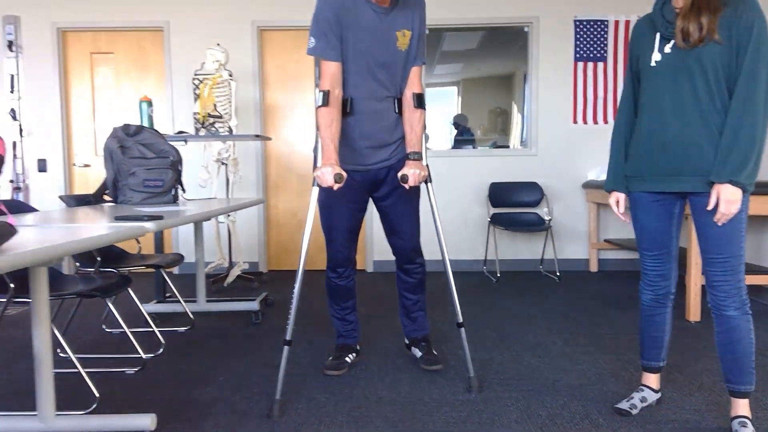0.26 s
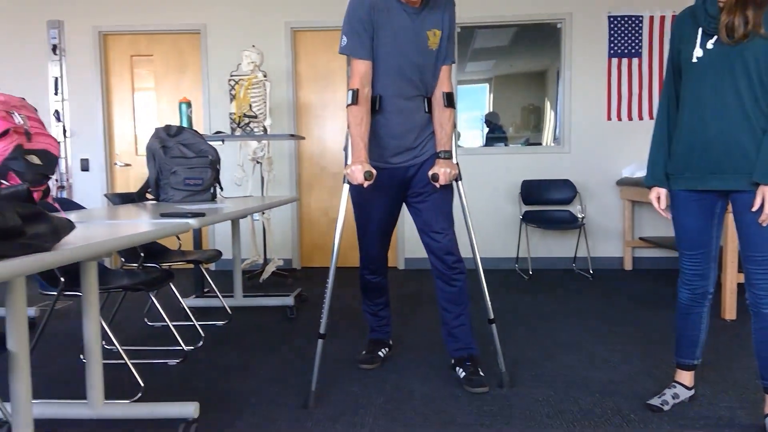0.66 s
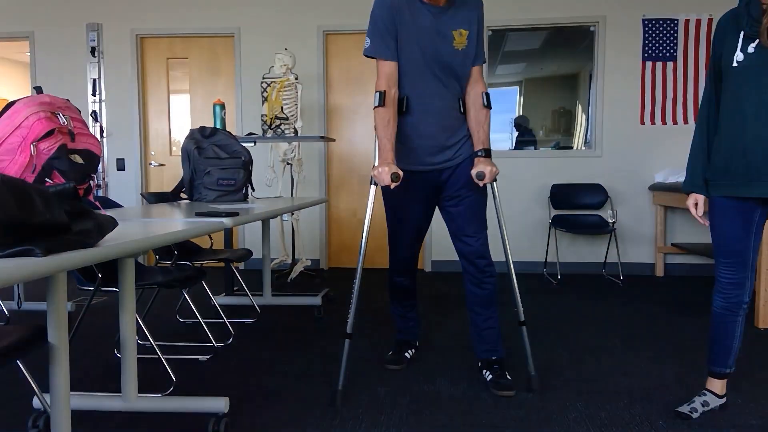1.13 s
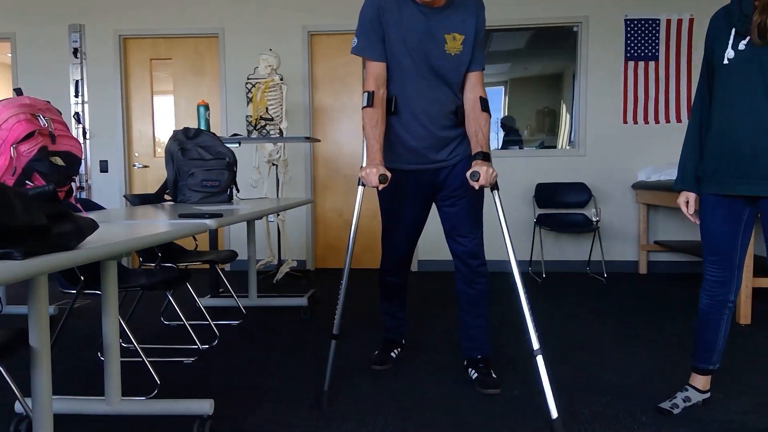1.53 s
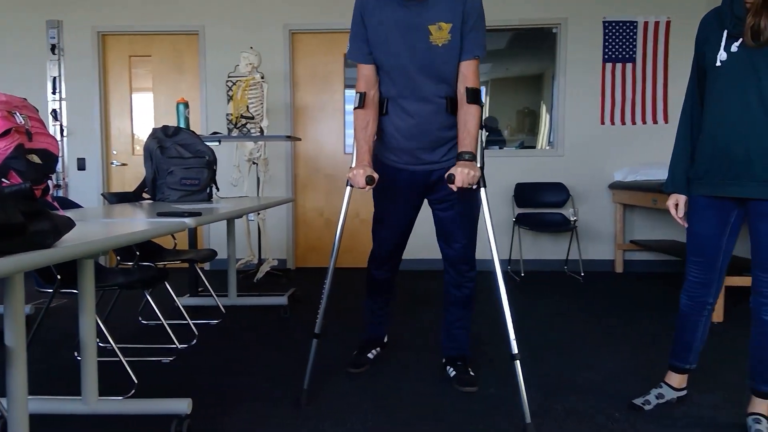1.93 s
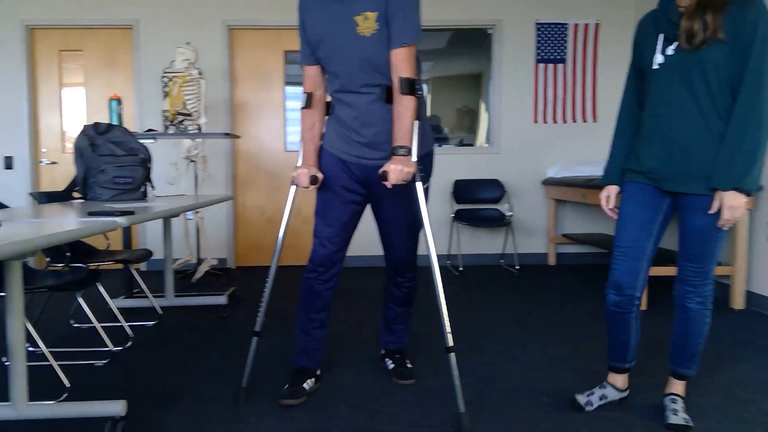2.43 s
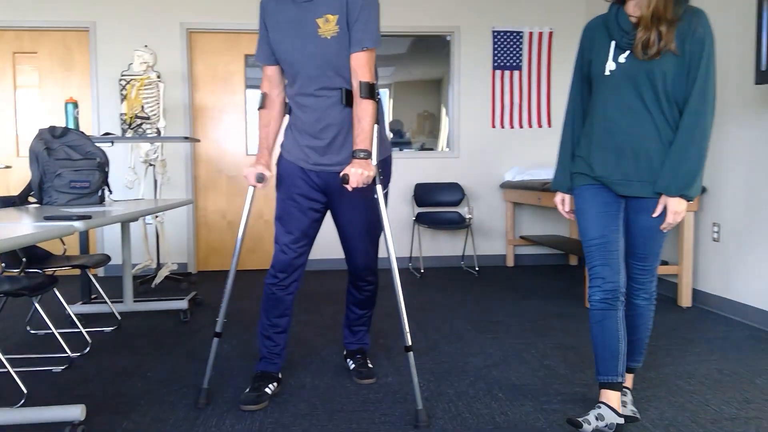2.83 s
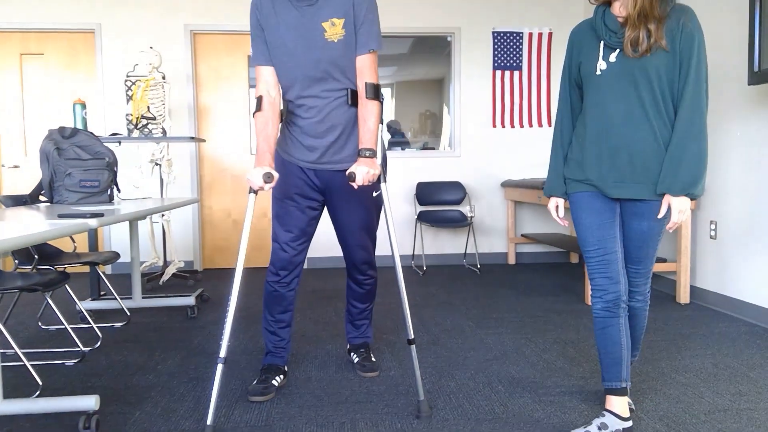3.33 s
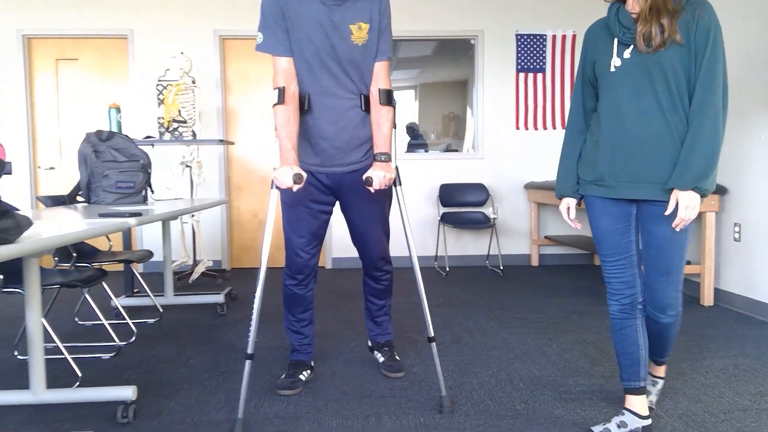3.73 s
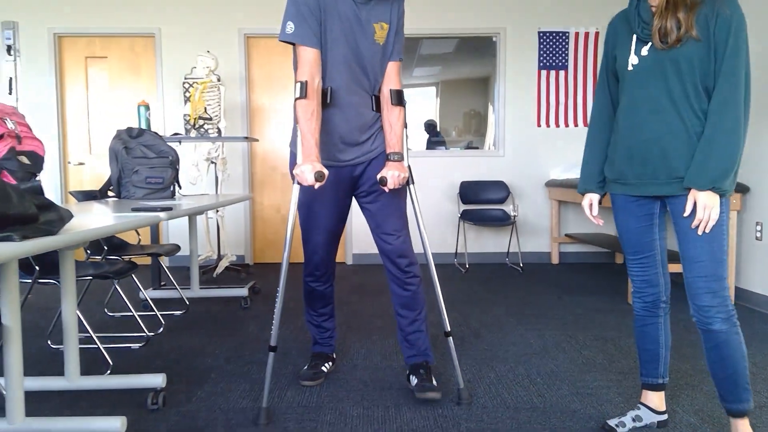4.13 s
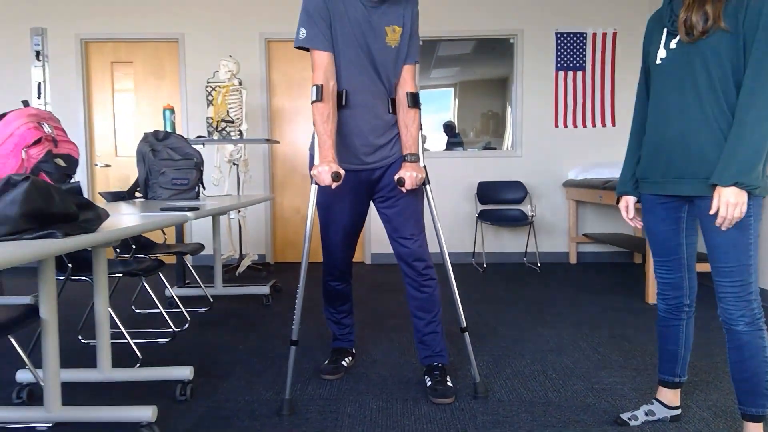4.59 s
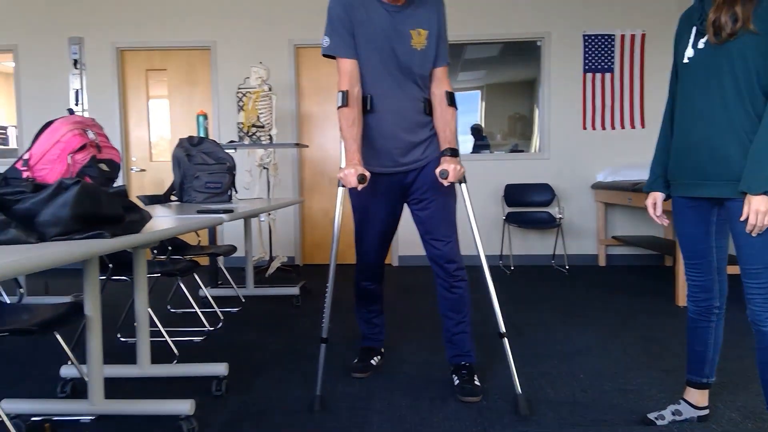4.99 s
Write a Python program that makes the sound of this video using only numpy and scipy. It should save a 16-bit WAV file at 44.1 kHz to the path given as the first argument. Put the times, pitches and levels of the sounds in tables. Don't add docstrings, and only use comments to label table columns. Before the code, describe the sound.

Low ventilation rumble and thin hiss fill a hard-walled, carpeted room. Crutch pins and cuffs tick faintly, a shoe steps softly, and a tip lands with a dull boom. After a rough sole drag come three increasingly strong metallic knocks, the last by far the loudest. Rubber chirps briefly, then brushes and tiny ticks fade into the room tone. Heard from a few metres by a small stereo microphone, the crutch sounds sit right of centre.

```python
import sys
import numpy as np
from scipy import signal
from scipy.fft import rfft, irfft, next_fast_len
from scipy.io import wavfile
from scipy.ndimage import uniform_filter1d

SR = 44100
rng = np.random.default_rng(int(sys.argv[2]) if len(sys.argv) > 2 else 0)


def file_out(sig):
    cols = np.atleast_2d(sig).T
    lim = np.clip(cols, -1, 1)
    pcm = np.round(lim * 32767).astype(np.int16)
    wavfile.write(sys.argv[1], SR, pcm)


def elevation(decibels):
    levels = np.asarray(decibels, float)
    return 10 ** (levels / 20)


N = 231611
TIME = np.arange(N) / SR

# (freq_hz, level_db, t60_s)
PIN = (0.36, [(590, -57.5), (1000, -33), (1550, -16), (2870, -10), (3500, 2), (4100, -17.5), (8000, -29),
       (11000, -81)], [(3500, -3, 0.067), (2950, -17, 0.012)])
CLIP = (1.26, [(300, -36), (500, -15.5), (1600, -14), (1890, 1.5), (3000, -27), (3620, 10.5), (4400, -12),
        (10000, -39)], [(3650, -13, .015), (3860, -3, 0.008), (2080, -21, 0.0089)])
CUFF = (0.59, [(880, -69), (1500, -36), (2620, -29), (3280, -9.5), (4400, -4.5), (5900, -1), (7100, -4.5),
        (15500, -26.5)], [(6910, -6, .025), (5960, -7, 0.033), (4460, -5, 0.011), (3400, -6, 0.022)])
JOINT = (.3, [(1500, -61.5), (2160, -22), (3000, -29), (3600, -5), (5800, -12.5), (6680, 4.5), (7400, -8),
         (16000, -23)], [(3740, -18.5, .25), (3628, -18, 0.24), (4082, -14.5, 0.064), (4032, 2.5, .016),
         (3480, -4.5, 0.0091), (6780, -12, .24), (6842, -12.5, .18), (6300, -6, 0.013), (2844, -22.5, 0.11),
         (2350, -22, 0.088)])
HEEL = (2.5, [(120, -39), (200, -9.5), (397, -5.5), (700, -17), (1230, -22), (1680, -12.5), (5000, -58),
        (11000, -120)], [(390, 0, .05), (753, 1.5, 0.2)])
TOE = (0.58, [(350, -44), (738, -1), (1090, -20), (1380, 4), (2100, -13), (4000, -40), (8800, -110)],
       [(1450, -6, .027)])
TIP = (9, [(240, -38), (450, 5.5), (1590, 5.5), (2300, -6.5), (2790, 3.5), (5310, -10), (7670, 0),
       (15500, -42)], [(2710, -8, .02), (3110, 8, 0.024), (4200, -11, .03), (530, -3, 0.019),
       (890, -8, 0.018), (1450, -3, 0.022)])
SHAFT = (0.68, [(150, -32), (420, -12), (830, -3.5), (1600, -10.5), (2050, -1), (4600, -11), (6500, -10),
         (16000, -24)], [(844.4, -2, 0.068), (1274.6, 10.5, 0.017), (1914, -14, 0.45), (2070, -12.5, 0.14),
         (2656, 2, 0.0094), (3726, -22, .18), (6413, -15.5, .1), (6800, -15.5, 0.13), (7300, -3.5, .037)])
CLASP = (.16, [(880, -61), (1500, -30.5), (2600, -31.5), (3220, 4), (4240, -5.5), (7600, -1.5),
         (10000, -10), (16000, -25.5)], [(3215, -0.5, .012), (4332, -4.5, .015), (5240, -6.5, 0.011),
         (6984, -2.5, 0.027), (8300, -10, .02), (14370, -15, 0.071)])
BUTTON = (.81, [(1470, -71), (2500, -42), (3290, -6), (4200, -8), (5790, -8), (6790, -5), (12000, -29),
          (20000, -100)], [(3400, 3.5, 0.018), (3735, -7, 0.13), (6930, -14.5, .08)])


def on_log(table, hz):
    table_hz, value = np.transpose(table)
    return np.interp(np.log(np.maximum(hz, 1)), np.log(table_hz), value)


def unit(x):
    return x / np.sqrt(np.mean(x ** 2))


def colour(x, gain):
    size = next_fast_len(x.shape[-1])
    cepstrum = irfft(np.log(gain(np.fft.rfftfreq(size, 1 / SR)) + 1e-9), size)
    cepstrum[1:size // 2] *= 2
    cepstrum[size // 2 + 1:] = 0
    return irfft(rfft(x, size) * np.exp(rfft(cepstrum)), size)[..., :x.shape[-1]]


def decay(t, t60_s):
    return np.exp(-np.log(1000) * t / t60_s)


def ring(t, hz, t60_s):
    return np.sin(2 * np.pi * hz * t) * decay(t, t60_s)


def sweep(hz):
    return 2 * np.pi * np.cumsum(hz) / SR


def pan(db):
    return elevation(np.array([[db], [-db]]) / 2)


def add(track, at_s, sound, pan_db):
    i = int(at_s * SR)
    part = sound[:N - i]
    track[:, i:i + len(part)] += part * pan(pan_db)


def walk(rate_hz):
    k = int(SR / rate_hz)
    steps = np.repeat(rng.standard_normal(N // k + 1), k)
    return 0.94 * uniform_filter1d(uniform_filter1d(steps, k), k)[:N]


def fade(start_s, end_s, edge_s):
    return np.clip(np.minimum(TIME - start_s, end_s - TIME) / edge_s, 0, 1)


def air():
    # freq_hz, level_db_per_hz
    spectrum = [(9, -26.5), (15, 5.5), (40, -21.5), (65, -16.5), (180, -27.5), (750, -45), (3300, -53),
                (15500, -59.5)]
    # freq_hz, likeness_0_to_1
    likeness = [(30, .92), (80, 0.98), (200, 1), (1000, 0.22), (5000, .05)]
    # time_s, level_db
    rumble = [(0, -0.5), (2.2, -2), (3.7, 0.5), (4.4, -1), (5.25, -3.5)]
    # freq_hz, level_db
    whine_tones = [(11806, -85.5)]
    # multiple_of_100_hz, level_db
    buzz_tones = [(8, -99), (9, -93.5), (10, -95.5), (11, -95)]
    level_db, top_hz, buzz_hz = -56.5, 15800, 100

    size = next_fast_len(N)
    f = np.fft.rfftfreq(size, 1 / SR)
    swell_db = np.interp(TIME, *np.transpose(rumble)) + 2.9 * walk(2.9)
    like = np.clip(on_log(likeness, f), 0, 1)
    tone = elevation(on_log(spectrum, f)) / np.hypot(1, (f / top_hz) ** 150)
    mid, side = rfft(rng.standard_normal((2, size))) * tone * np.sqrt([1 + like, 1 - like])
    place = 2 * np.log2(np.clip(f, 20, 20 * 2 ** 9.5) / 20)
    noise = 0
    for band in range(20):
        share = np.clip(1 - np.abs(place - band), 0, 1)
        depth = np.clip(1.3 - band / 14, .1, 1)
        part = irfft([(mid + side) * share, (mid - side) * share], size)[:, :N]
        noise = noise + elevation(depth * (swell_db + 0.63 * walk(10))) * part
    whine = sum(elevation(db + 3.5) * np.sin(2 * np.pi * hz * TIME) for hz, db in whine_tones)
    buzz = sum(elevation(db + 6.0) * np.sin(2 * np.pi * k * buzz_hz * TIME) for k, db in buzz_tones)
    return elevation(level_db) * unit(noise) + whine + fade(1.36, 2.05, 0.02) * buzz


def whistles():
    # start_s, length_s, first_hz, last_hz, level_db
    glides = [
        (.89, .08, 14800, 14850, -78),
        (.99, .07, 14700, 14800, -87),
        (1.085, .09, 13600, 12700, -85),
        (4.542, 0.068, 13500, 14200, -75.5),
        (4.593, .09, 14590, 16000, -85),
        (4.76, .16, 15300, 15280, -80),
        (4.736, 0.13, 14700, 13600, -89),
    ]
    out = 0
    for start_s, length_s, first_hz, last_hz, db in glides:
        hz = np.interp(TIME, [start_s, start_s + length_s], [first_hz, last_hz]) + 110 * walk(150)
        swell = fade(start_s, start_s + length_s, length_s / 2) ** 2
        out = out + swell * elevation(db + 8 + 4.7 * walk(40)) * np.sin(sweep(hz))
    return out


def thuds():
    # start_s, level_db, freq_hz, t60_s
    knocks = [
        (.22, -70, 519, 1.),
        (.423, -65.5, 393, 0.17),
        (.76, -60, 95, 0.42),
        (1.119, -71.5, 530, .3),
        (2.1, -62, 68.4, 0.59),
        (2.481, -55, 206, 0.19),
        (3.718, -70, 110.2, 0.37),
        (4.55, -81, 548, 0.97),
    ]
    # start_s, level_db, tilt_db_per_octave
    landings = [
        (1.681, -57.5, 0),
        (3.381, -45, -0.5),
    ]
    # freq_hz, level_db, t60_s
    slab = [(30.87, -5, 0.56), (68, 1.5, 0.93), (95, -10, .7), (119.5, -6, 0.44), (187.6, -6, 0.64),
            (240.6, -9, 0.94), (331, -5, 0.33)]
    side_db = -10

    out, t = np.zeros((2, N)), TIME[:SR]
    booms = [(at_s, db + mode_db + tilt_db * np.log2(hz / 100), hz, t60_s)
             for at_s, db, tilt_db in landings for hz, mode_db, t60_s in slab]
    for at_s, db, hz, t60_s in knocks + booms:
        mid, side = (sum(ring(t + lead / hz, hz + 11 * detune, np.inf) for detune, lead in draw)
                     for draw in rng.standard_normal((2, 5, 2)))
        swell = elevation(db - 4.0) * (1 - np.exp(-t * hz / 1.6)) * decay(t, t60_s)
        side_gain = elevation(side_db) * hz / 100 / (1 + hz / 300)
        boom = swell * (mid + side_gain * side * np.array([[1], [-1]]))
        i = int(at_s * SR)
        out[:, i:i + SR] += boom[:, :N - i]
    return out


def scuffs():
    # start_s, length_s, level_db, stiffness_ratio, rumble_share_db
    drags = [
        (1.023, 0.18, -89.5, 0.34, 12.5),
        (1.75, .12, -85, 1.3, 12),
        (1.883, 0.13, -78.5, 1.22, 2),
        (2.212, 0.11, -65.5, 0.93, -3),
        (2.258, 0.13, -67, 1.02, -4),
        (2.373, 0.19, -51, .98, -8.5),
        (3.675, 0.24, -76.5, 1.16, 9.5),
        (4.185, 0.0984, -65, 1.36, -25),
        (4.24, 0.089, -60.5, 1.12, -4),
    ]
    # freq_hz, width_hz, level_db
    sole_modes = [(755.5, 140, -12.5), (1212, 250, -2.5), (1340, 85, -0.5), (1560, 190, 1.5),
                  (1705, 83, -11), (1900, 320, -10.5), (2290, 98, -4)]
    # freq_hz, level_db_per_hz
    pile = [(1470, -59), (2500, -1), (3450, -0.5), (4260, 3), (6980, -10), (9710, -17), (15000, -26.5)]
    attack_s, release_s, sag_db = 0.038, 0.04, -5

    tugs = rng.standard_normal((3, N))
    bursts_db = 1.2 * rng.exponential(size=(3, N // 64 + 1)).clip(0, 2.5)
    tugs = tugs * elevation(bursts_db.repeat(64, axis=1)[:, :N])
    hiss = unit(colour(tugs[1], lambda f: elevation(on_log(pile, f))))
    floor = unit(colour(tugs[2], lambda f: np.sqrt(f / 300) / (1 + (f / 700) ** 3)))
    out, uneven_db = 0, 2.5 * walk(45)
    for start_s, length_s, db, stiffness, rumble_db in drags:
        sole = unit(colour(tugs[0], lambda f: sum(
            elevation(mode_db) / np.hypot(1, 2 * (f / stiffness - hz) / width_hz) ** 2
            for hz, width_hz, mode_db in sole_modes)))
        done = np.clip((TIME - start_s) / length_s, 0, 1)
        edges = np.minimum(done * length_s / attack_s, (1 - done) * length_s / release_s)
        press = np.clip(edges, 0, 1) ** 2 * elevation(db - 4.0 + sag_db * done + uneven_db)
        hiss_db = -9.5 + 3.5 - 0.4551 * (max(db, -70) + 64.5)
        out = out + press * (sole + hiss * elevation(hiss_db) + floor * elevation(rumble_db))
    return out * pan(-10)


def squeak():
    creep_s, grab_s, free_s = 3.68, 3.742, 3.828
    grab_hz, slip_hz_per_s = 1116, 11500
    creep_db, slip_db, chirp_db, chirp_s = -68.5, -60.5, -38.5, 0.0053

    since_s = TIME - grab_s
    rate_hz = grab_hz + slip_hz_per_s * np.clip(since_s, -.1, .1)
    phase = sweep(rate_hz * (1 + 0.043 * walk(260)))
    slip = elevation(slip_db) + elevation(chirp_db) * np.exp(-np.abs(since_s) / chirp_s)
    load = elevation(creep_db) + np.clip(since_s / 0.0032, 0, 1) * slip
    grip = fade(creep_s, free_s, 0.008) * load * elevation(5.1 * walk(200))
    return grip * (np.sin(phase) + elevation(-26.5) * np.sin(3 * phase)) * pan(3)


def ticks():
    # start_s, peak_db, freq_hz, t60_s, partner_mode_ratio
    touches = [
        (1.139, -80, 3500, .032, .96),
        (1.349, -80, 3400, 0.02, 1),
        (1.901, -75, 1340, 0.049, 1.85),
        (2.087, -68.5, 3150, 0.016, 1.18),
        (2.39, -64, 4200, 0.065, 1.07),
        (4.833, -67, 3650, 0.05, 0.91),
        (5.04, -81, 3400, .041, 1.13),
        (.001, -71, 1450, .013, 2.03),
        (2.871, -68.5, 2016, .033, 1.24),
        (3.79, -75.5, 5710, 0.065, 0.65),
    ]
    partner_db, partner_t60_s, grit_db, grit_s = -6, 0.044, -21.5, 0.00033

    out, t = np.zeros((2, N)), TIME[:SR // 2]
    for at_s, db, hz, t60_s, ratio in touches:
        modes = ring(t, hz, t60_s) + elevation(partner_db) * ring(t, hz * ratio, partner_t60_s)
        grit = np.diff(rng.standard_normal(len(t) + 1)) * np.exp(-t / grit_s)
        push = 1 - np.exp(-t * hz / 0.89)
        add(out, at_s, elevation(db) * (push * modes + elevation(grit_db) * grit), pan_db=-22)
    return out


def clacks():
    # start_s, peak_db, left_minus_right_db, ring_db, contact_ms, struck part
    blows = [
        (.189, -57.5, -23.5, 0, 4.5, PIN),
        (.4253, -41.5, -23.5, -8.5, 0.65, CUFF),
        (0.5969, -47.5, -25, -12, 2.3, CLIP),
        (.701, -55, -9, -23, 5.6, HEEL),
        (.815, -62, -11, -14, 1.8, TOE),
        (1.675, -43.5, -18.5, -17, 3.3, TIP),
        (2.800, -30.5, -18.5, -16, 0.86, CLASP),
        (3.055, -23, -16, -15, 1.28, JOINT),
        (3.377, -11, -11, -17.5, 2.6, SHAFT),
        (4.004, -64, -21, -1, 1.9, BUTTON),
    ]
    longest_ring_s = .3

    out, t = np.zeros((2, N)), TIME[:SR // 2]
    rattle_db = 9 * walk(90)
    for at_s, db, pan_db, ring_db, contact_ms, (rise_ms, tone, modes) in blows:
        rise = 1 - np.exp(-(t * 1000 / rise_ms) ** 2)
        contact = rng.standard_normal(len(t)) * rise * np.exp(-t * 1000 / contact_ms)
        own = np.sqrt(uniform_filter1d(np.abs(rfft(contact)) ** 2, size=150))
        own_hz = 2 * np.arange(len(own))
        crack = colour(contact, lambda f: elevation(on_log(tone, f)) / np.interp(f, own_hz, own))
        tube = 0
        for hz, mode_db, t60_s in modes:
            flutter_db = np.roll(rattle_db, int(9 * hz + at_s * SR))[:len(t)]
            tube = tube + elevation(mode_db + flutter_db) * ring(t, hz, min(t60_s, longest_ring_s))
        blow = crack / np.abs(crack).max() + elevation(ring_db) * rise * tube
        add(out, at_s, elevation(db) * blow, pan_db)
    return out


def room(x):
    # delay_ms, level_db
    echoes = [(2.5, -13), (5.5, -13), (10, -8), (12, -11), (22, -12), (28, -15)]
    # freq_hz, t60_s
    room_t60 = [(100, 1), (400, 0.45), (1200, .3), (4000, 0.28), (12000, 0.27)]
    tail_db = -0.5

    t = TIME[:SR * 3 // 4]
    f = np.fft.rfftfreq(len(t), 1 / SR)
    noise = rfft(rng.standard_normal((2, len(t))))
    near = 1 / (1 + (f / 450) ** 2)
    noise[0] = near * noise[1] + np.sqrt(1 - near ** 2) * noise[0]
    place = np.log2(np.clip(f, 60, 60 * 2 ** 8) / 60)
    tail = 0
    for band in range(9):
        share = np.clip(1 - np.abs(place - band), 0, 1)
        tail = tail + irfft(noise * share, len(t)) * decay(t, on_log(room_t60, 60 * 2 ** band))
    clumps = elevation(3.2 * walk(350)[:len(t)] * np.exp(-t / 0.028))
    tail = tail * clumps * (1 - np.exp(-(t / 0.0058) ** 2))
    answer = elevation(tail_db) * tail / np.sqrt(np.sum(tail ** 2, axis=1, keepdims=True))
    spread = rng.integers(-9, 10, (len(echoes), 2))
    for (delay_ms, db), shift in zip(echoes, spread):
        answer[[0, 1], int(delay_ms * SR / 1000) + shift] += elevation(db)
    return signal.fftconvolve(x.mean(axis=0, keepdims=True), answer, axes=1)[:, :N]


def scene():
    port_lag_samples = 4
    drag_room_db = -5
    struck = clacks() + ticks()
    dragged = scuffs() + squeak()
    ports = struck + dragged + thuds() + whistles() + air()
    ports[0] = np.roll(ports[0], port_lag_samples)
    return ports + room(struck + elevation(drag_room_db) * dragged) * pan(-2.4)


def band_limit(x):
    return signal.sosfilt(signal.butter(12, 16830, fs=SR, output="sos"), x)


def record(dry):
    return band_limit(dry)


dry = scene()
out = record(dry)
file_out(out)
```